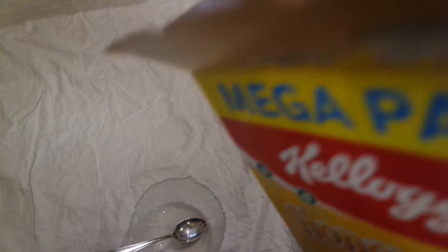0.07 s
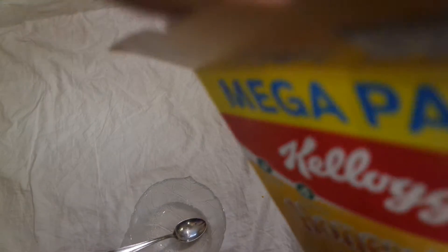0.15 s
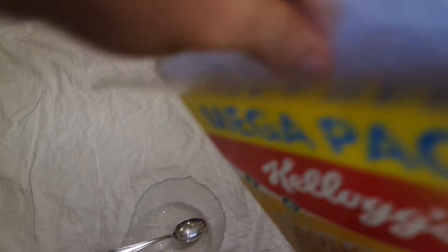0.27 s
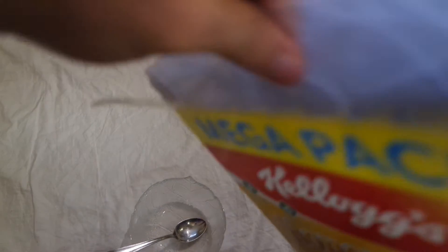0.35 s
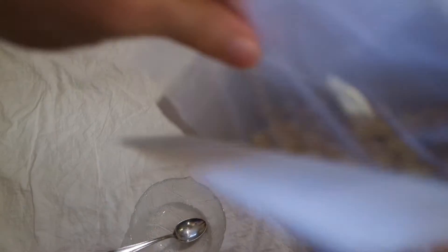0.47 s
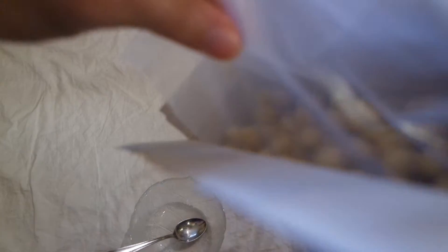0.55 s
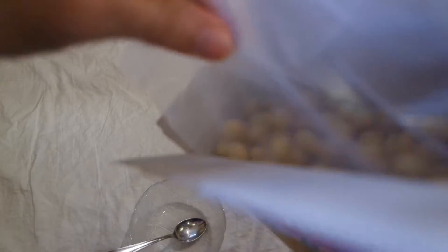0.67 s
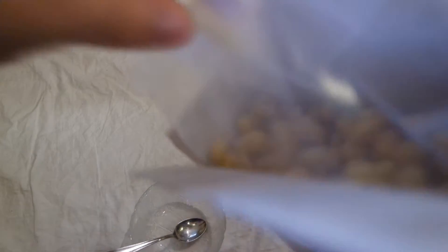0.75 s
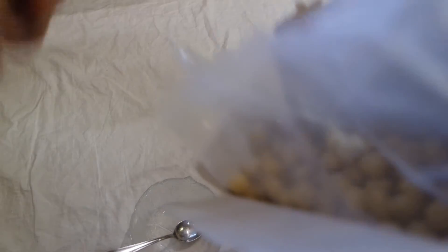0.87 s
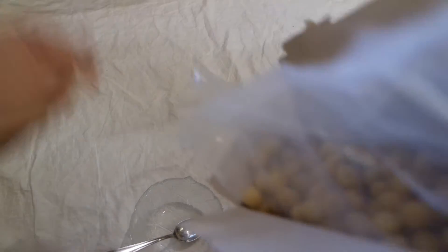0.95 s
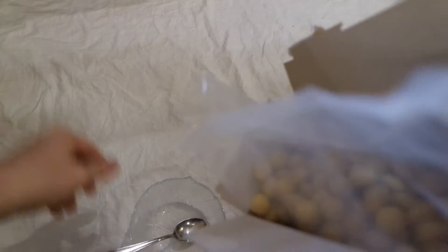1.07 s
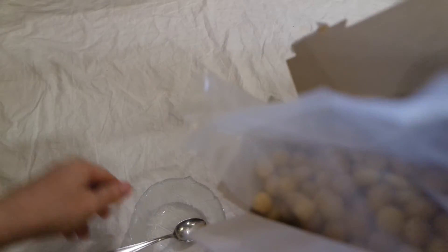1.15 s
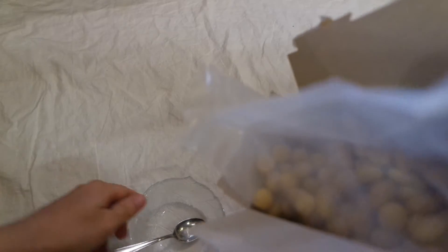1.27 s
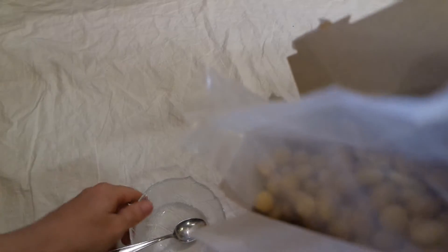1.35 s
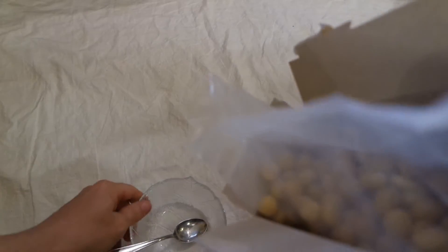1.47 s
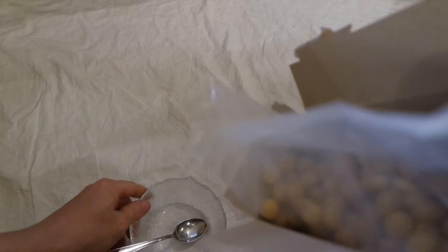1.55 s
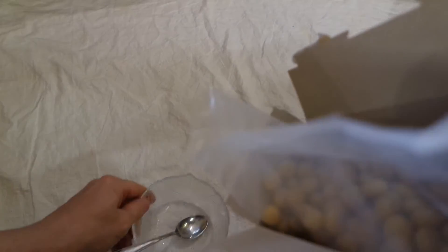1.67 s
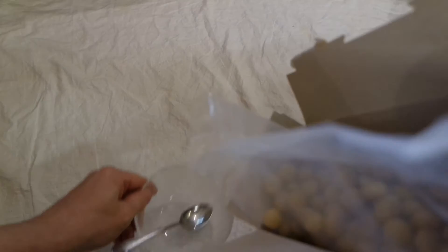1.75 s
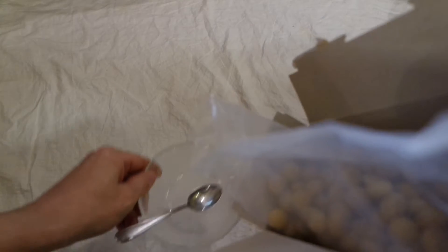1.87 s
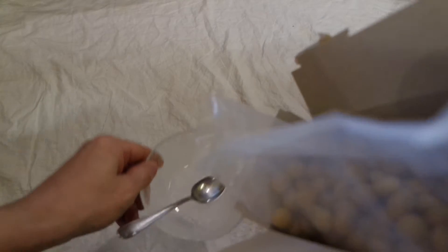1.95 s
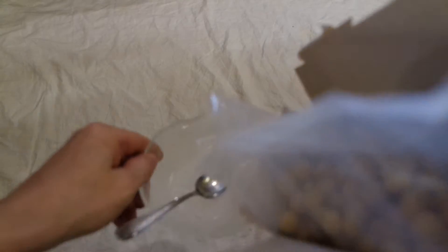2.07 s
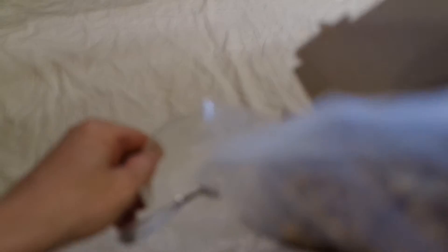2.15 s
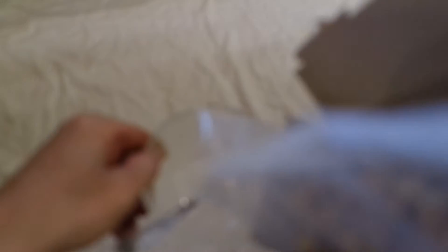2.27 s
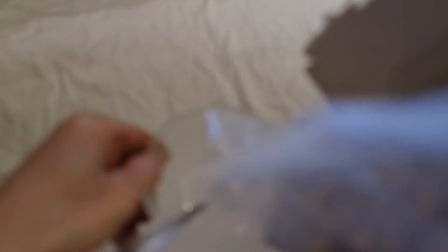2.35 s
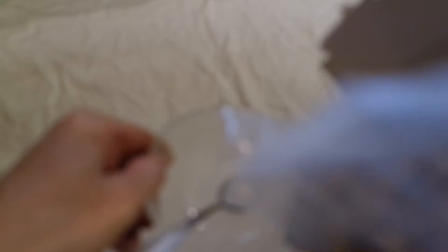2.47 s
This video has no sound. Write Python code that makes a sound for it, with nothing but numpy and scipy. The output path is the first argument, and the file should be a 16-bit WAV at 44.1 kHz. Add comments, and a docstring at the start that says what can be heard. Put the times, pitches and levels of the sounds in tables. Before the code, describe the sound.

Close stereo pickup in a small room: sharp bag crackle first, then hollow cardboard knocks and a dense dry cereal rattle, fading to near silence with light ticks, before the cereal begins shifting again.

```python
"""Cereal box on a cloth-covered table

A cardboard box holding a plastic bag of cereal balls is handled in a small room, over a faint hiss.
The bag snaps and crinkles as it is opened, the box slides and bumps while the balls shift inside,
a glass bowl is drawn closer with a few light ticks, and the cereal starts to move again.
Snaps and knocks are noise bursts led by a crack; crinkle, cereal, rubbing and rumble are dense noise
grains under level curves; thumps are short swells of a sine; box modes and room echo are added on top."""
import sys
import numpy as np
from scipy import signal
from scipy.fft import rfft, irfft
from scipy.io import wavfile
from scipy.ndimage import uniform_filter1d

SR = 44100
rng = np.random.default_rng(int(sys.argv[2]) if len(sys.argv) > 2 else 0)


def unload_wav(signal):
    """Save mono or channel-first audio to the path in sys.argv[1] as 16-bit WAV at rate SR, clipped to [-1, 1]."""
    wavfile.write(
        sys.argv[1],
        SR,
        np.round(np.clip(np.atleast_2d(signal).T, -1, 1) * 32767).astype(np.int16),
    )


N = 110250  # 2.5 s


def amp(db):
    """Decibels to gain."""
    return 10 ** (np.asarray(db) / 20)


def unit(x):
    """Scales to rms 1."""
    return x / np.sqrt(np.mean(x ** 2) + 1e-20)


def read(points, hz):
    """A spectrum's value at hz, joined by straight lines on a log frequency axis."""
    f, value = np.transpose(points)
    return np.interp(np.log(hz + 1), np.log(f + 1), value)


def add(mix, s, sound):
    """Mixes a stereo sound in at time s, cut off at the end of the mix."""
    part = mix[:, round(s * SR):][:, :sound.shape[1]]
    part += sound[:, :part.shape[1]]


def colour(x, points, size=2048):
    """Filters with the given spectrum in minimum phase, so that nothing sounds ahead of its cause."""
    hz = abs(np.fft.fftfreq(size, 1 / SR))
    log_gain = np.log(amp(read(points, hz)))
    response = np.exp(np.conj(signal.hilbert(log_gain)))
    taps = np.fft.ifft(response).real
    taps = taps.reshape((1,) * (x.ndim - 1) + (-1,))
    return signal.fftconvolve(x, taps, axes=-1)[..., :x.shape[-1]]


def stereo(mid, side, width=None):
    """Stereo from a shared and an opposed part: by default narrowest at 300 to 700 Hz, wide in the treble."""
    # usual stereo width: f/Hz, side level/dB
    usual_width = [(30, 0), (90, -12), (300, -18.5), (700, -19), (1500, -14.5), (3000, -13.5), (6000, -4.5),
                   (13000, 1)]
    side = colour(side, usual_width if width is None else width)
    return np.array([mid + side, mid - side])


def grains(level, body, per_s, spread_db, grain_s, clump_db):
    """Many tiny contacts of uneven size, in clumps, each a brief scratch, under a level curve."""
    t = np.arange(N) / SR
    struck = rng.random(N) < per_s / SR
    sizes = amp(spread_db * np.minimum(rng.exponential(1, N), 3.5)) * struck
    # each scratch falls to 1/e of its amplitude in grain_s
    power = signal.lfilter([1], [1, -np.exp(-2 / (grain_s * SR))], sizes ** 2)
    drift = uniform_filter1d(rng.standard_normal(N), size=260)  # noise smoothed over 6 ms
    clumps = amp(clump_db * unit(drift))
    mid, side = rng.standard_normal((2, N)) * np.sqrt(power) * clumps
    curve = amp(np.interp(t, *np.transpose(level)))
    return unit(colour(stereo(mid, side), body)) * curve


def cereal_jostle():
    """Cereal balls jostle in the bag: a dense rain of tiny bright contacts."""
    # how strongly the balls move: t/s, level/dB
    movement = [(0, -64.5), (.15, -78), (.75, -56), (.8, -71), (.84, -41.5), (.88, -31), (.915, -33),
                (.95, -32.5), (1.0, -31), (1.08, -35.5), (1.15, -38.5), (1.23, -43), (1.3, -59.5),
                (1.39, -60), (1.48, -76.5), (1.72, -90), (1.75, -61.5), (1.79, -83), (1.92, -78),
                (1.97, -68.5), (2.15, -83.5), (2.39, -71), (2.43, -62.5), (2.44, -51.5), (2.5, -50)]
    # tone of the contacts: f/Hz, gain/dB
    body = [(100, -22), (500, 8.5), (1200, 0), (2800, 1.5), (5000, 1.5), (8000, -3), (11000, -6.5),
            (14000, -6.5), (16000, -21)]
    return grains(movement, body, per_s=3700, spread_db=2, grain_s=0.0004, clump_db=1.0)


def cloth_rub():
    """Cardboard and bowl rub over the cloth in many small slips, darker and more clumped."""
    # how strongly they rub: t/s, level/dB before the box rings along
    sliding = [(0, -71), (.17, -81), (.23, -85), (.35, -50), (.42, -45), (.52, -41), (.6, -38.5), (.7, -45),
               (.8, -66), (.87, -39.5), (.98, -40), (1.06, -43), (1.13, -42.5), (1.22, -54), (1.33, -61),
               (1.5, -82.5), (1.89, -73), (1.94, -60.5), (2.05, -70.5), (2.42, -69.5), (2.436, -44.5),
               (2.46, -46), (2.5, -43)]
    # tone of the rubbing: f/Hz, gain/dB
    body = [(25, -28.5), (60, -13.5), (130, -3.5), (280, -4), (430, -4), (560, 1), (660, -8), (790, -4),
            (1200, -4), (2000, -11.5), (4000, -17.5), (12000, -33)]
    return grains(sliding, body, per_s=1300, spread_db=1.5, grain_s=.0008, clump_db=2.5)


def handling_rumble():
    """Low rumble of handling: longer grains kept to the bass."""
    # how strongly it rumbles: t/s, level/dB
    handling = [(0, -66), (.16, -79), (.26, -39.5), (.33, -56.5), (.43, -45), (.6, -60), (.8, -53),
                (.87, -42.5), (.97, -39.5), (1.06, -51.5), (1.3, -56), (1.5, -82), (1.89, -71),
                (1.94, -55.5), (2.1, -71), (2.41, -69.5), (2.46, -52.5), (2.5, -46.5)]
    # tone of the rumble: f/Hz, gain/dB
    body = [(15, -10.5), (40, -10), (80, -3.5), (135, -1), (190, -7), (270, -3), (400, -16), (1500, -60)]
    return grains(handling, body, per_s=1300, spread_db=1.5, grain_s=0.0038, clump_db=1.0)


def room_hiss():
    """Faint steady coloured noise that comes from all round, so wider than the close sounds."""
    # tone of the hiss: f/Hz, gain/dB
    body = [(12, -31), (20, 4.5), (70, 1.5), (198, -12), (410, -8), (2320, -19.5), (3340, -25),
            (13200, -30), (14700, -25.5), (16000, -55)]
    # stereo width of the hiss: f/Hz, side level/dB
    wide = [(30, -9.5), (90, -7.5), (300, -3.5), (700, -3.5), (1500, -3), (4000, -0.5), (13000, 2)]
    noise = stereo(*rng.standard_normal((2, N)), wide)
    return amp(-67) * unit(colour(noise, body))


def thumps(size=4096):
    """A soft push makes a wall of the box swing for a few cycles: a sine that swells and dies."""
    # soft thumps of the box: t/s, envelope peak/dB, swell/s, pitch f/Hz
    pushes = [(.176, -50.5, 0.0034, 200), (.607, -35, 0.0072, 426), (0.9977, -27.5, 0.0035, 295),
              (1.1013, -27, 0.0024, 368), (1.1255, -24, 0.0018, 370)]
    out = np.zeros((2, N))
    t = np.arange(size) / SR
    for start, peak_db, swell_s, hz in pushes:
        envelope = amp(peak_db) * t / swell_s * np.exp(1 - t / swell_s)
        swing = envelope * np.sin(2 * np.pi * hz * t)
        add(out, start, np.tile(swing, (2, 1)))
    return out


def bag_crinkle():
    """Fine crinkle of the bag: thousands of tiny creases a second, very uneven in size."""
    # how strongly it crinkles: t/s, level/dB
    crumpling = [(.196, -102), (.208, -37.5), (.23, -39), (.25, -39.5), (.295, -33), (.35, -50.5),
                 (.38, -38.5), (.45, -39), (.5, -44.5), (.57, -38.5), (.6, -44), (.65, -42.5), (.72, -40.5),
                 (.79, -44.5), (.85, -34.5), (.9, -83)]
    # tone of the crinkle: f/Hz, gain/dB
    body = [(24, -43), (40, -4.5), (256, -8), (354, -4), (503, -0.5), (663, -1), (790, 3.5), (1300, -1),
            (4800, -5), (7000, -10), (13800, -12.5), (14800, -11.5), (16000, -48.5)]
    return grains(crumpling, body, per_s=2800, spread_db=3.5, grain_s=0.00043, clump_db=1.1)


def blow(level_db, decay_ms, ring_hz, ring_db, body, q, edge, size=4096):
    """A crack and a fast-dying flutter through one broad resonance; level is its energy packed into 1 ms."""
    ms = np.arange(size) * 1000 / SR
    mid, side = rng.standard_normal((2, size)) * np.exp(-ms / decay_ms)
    # a flutter shorter than 1 ms leaves more to the first crack
    crack = edge * max(1, 1 / decay_ms)
    mid[0], mid[1] = crack * 2, -crack
    x = colour(stereo(mid, side), body)
    ring = signal.lfilter(*signal.iirpeak(ring_hz, q, SR), x)
    x = x + (amp(ring_db) - 1) * ring
    return amp(level_db) * unit(x) / np.sqrt(ms[-1])


def blows(table, body, q, edge):
    """Plays a table of snaps or knocks; q is the ring's sharpness, edge the crack against the flutter."""
    out = np.zeros((2, N))
    for start, *row in table:
        add(out, start, blow(*row, body, q, edge))
    return out


def bag_snaps():
    """Sharp ticks, mostly creases of the bag snapping through, each with a broad ring."""
    # ticks: t/s, level/dB, decay/ms, ring f/Hz, ring gain/dB
    ticks = [(.2065, -29, 8.9, 1670, 19), (.2098, -27.5, 3.9, 13100, 20), (.2580, -21, 7.2, 4000, 5),
             (.2683, -12, 3.2, 4000, 1), (.2692, -18.5, 1.2, 13300, 23), (.2772, -19, 1.4, 4200, 20),
             (.2797, -14.5, 0.88, 3660, 19), (.2934, -11, 1.3, 9100, 10), (.2937, -16, 1.5, 1900, 18),
             (.3012, -35.5, 1.2, 2500, 2.5), (.3701, -15, 2.9, 12550, 4.5), (.3742, -16, 3, 4440, 7),
             (.4005, -21.5, 2.9, 12600, 6.5), (.4193, -20.5, 1.3, 13800, 24), (.4287, -19, 3.1, 12500, -1),
             (.4665, -24, 10, 4080, 10), (.4737, -19, 3.2, 4400, 3), (.5063, -26, 1.1, 2600, 15),
             (.5235, -32, 0.67, 4540, 7), (.5344, -20, 2, 11600, 6), (.5515, -39, 1.9, 12000, -9.5),
             (.5552, -14.5, 5.8, 2550, 7.5), (.6078, -19, 1.5, 5340, 10), (.6206, -15, 0.74, 12930, 11),
             (.6212, -13, 1.2, 1380, 1), (.7172, -29, 1.4, 1700, 12), (.8406, -22.5, 2.6, 2860, 15),
             (.9110, -22.5, 1.7, 3200, 12), (.9482, -19, 2.1, 7300, 11), (1.0693, -21, 1.2, 12000, 4.5),
             (1.2775, -40, 1.1, 5000, 12), (1.3090, -38.5, 1.1, 4200, 21.5),
             (1.3560, -48, 1.34, 12160, 9.5), (1.3750, -43.5, 1.2, 7150, 4.5),
             (1.4150, -56.5, 1.4, 4470, 5), (1.8675, -57.5, 1.14, 4000, 5), (1.9105, -39, 1.2, 5300, 18.5),
             (1.9242, -34.5, 2.5, 5740, 15), (1.9870, -56, 2.8, 2200, 18), (2.0380, -59.5, 1.77, 4790, 7),
             (2.4332, -32, 0.51, 3985, 5), (2.4645, -36, 1.7, 2700, 15)]
    # tone of the ticks: f/Hz, gain/dB
    body = [(100, -26.5), (500, -5.5), (1500, 2), (4000, 1), (7000, -0.5), (11000, -2), (14000, -0.5),
            (17000, -14.5)]
    return blows(ticks, body, q=3.0, edge=1.8)


def box_knocks():
    """Bumps of the box and of things set on the cloth: duller blows with a stronger first crack."""
    # bumps: t/s, level/dB before the box rings along, decay/ms, ring f/Hz, ring gain/dB
    bumps = [(.2765, -25, 19, 113, 28), (.622, -27.5, 28, 445, 20), (.8405, -23, 2.5, 1730, 30),
             (.868, -27, 9.7, 760, 13), (.88, -22, 9, 1040, 17), (.912, -23.5, 16, 790, 21),
             (.949, -22, 5.5, 267, 19), (1.0925, -26.5, 3.2, 403, 12.5), (1.1254, -18.5, 2.8, 1740, 7),
             (1.5085, -60.5, 2.5, 2180, 13), (1.585, -57.5, 4, 2000, 5), (1.7165, -50, 2.6, 2370, 15),
             (1.7185, -51.5, 13, 796, 13.5), (1.911, -48.5, 11.8, 400, 16), (1.926, -41, 24, 125.8, 16.5),
             (2.332, -57.5, 3.3, 1217, 18)]
    # tone of the bumps: f/Hz, gain/dB
    body = [(30, -16), (120, 3.5), (350, -3), (800, -2), (2000, -2), (3500, -14), (8000, -24.5),
            (16000, -31.5)]
    return blows(bumps, body, q=3.2, edge=6.0)


def hollow(x):
    """The box rings along with whatever rubs or bumps it; the overall level is kept."""
    # hollow resonances of the box: f/Hz, width/Hz, gain of the added ring/dB
    modes = [(271.5, 35, -5), (411, 45, 0.5), (439, 30, -3), (778, 59, 2.5), (1005, 38, -9)]
    ringing = x.copy()
    for hz, width, db in modes:
        ringing += amp(db) * signal.lfilter(*signal.iirpeak(hz, hz / width, SR), x)
    return x.std() * unit(ringing)


def room(x, size=22050):
    """Quick scatter from box and table, then the tail of a small room, as decaying noise echoes."""
    # time for the tail to fall by 60 dB: f/Hz, t/s
    fall_s = [(150, 0.96), (500, .42), (1500, 0.27), (4000, 0.19), (12000, 0.2)]
    t = np.arange(size) / SR
    noise = stereo(*rng.standard_normal((2, size)))
    hz, at, z = signal.stft(noise, SR, nperseg=256)
    fading = z * amp(-60 * at / read(fall_s, hz)[:, None])
    tail = signal.istft(fading, SR, nperseg=256)[1][:, :size]
    tail = tail * np.clip(t / 0.0045 - .5, 0, 1)  # fades in from 2.25 to 6.75 ms
    # the scatter starts after 1 ms and falls to 1/e in 17 ms
    early = stereo(*rng.standard_normal((2, size))) * np.exp(-t / 0.017) * (t > .001)
    echo = (amp(-13) * unit(tail) + amp(-10.5) * unit(early)) / np.sqrt(size)
    mono = x.mean(0)[None]
    return x + signal.fftconvolve(mono, echo, axes=1)[:, :N]


def scene():
    """Bag, cereal and box in the room, over the handling rumble and a faint hiss."""
    cereal = cereal_jostle()
    box = hollow(cloth_rub() + box_knocks()) + thumps()
    bag = bag_crinkle() + bag_snaps()
    return room(bag + cereal + box) + handling_rumble() + room_hiss()


def record(dry):
    """The right microphone is nearer: louder and a little earlier; peaks clip and the top treble is cut."""
    # how much louder the right is: f/Hz, level difference/dB
    right_lead = [(100, 2.5), (700, 1), (2500, 1.5), (13000, 2.5)]
    # treble response of the microphones: f/Hz, gain/dB
    mic_top = [(20, -5), (14600, 0.5), (15400, -22.5), (16800, -20.5)]
    lag_ms, ceiling, edge_hz = 0.038, .95, 16800
    khz = np.fft.rfftfreq(2 * N, 1000 / SR)
    late = irfft(rfft(dry[0], 2 * N) * np.exp(-2j * np.pi * khz * lag_ms))[:N]
    left = colour(late, [(hz, -db / 2) for hz, db in right_lead])
    right = colour(dry[1], [(hz, db / 2) for hz, db in right_lead])
    heard = colour(np.array([left, right]), mic_top)
    clipped = np.clip(heard, -ceiling, ceiling)
    cut = signal.firwin(511, edge_hz, window=("kaiser", 9), fs=SR)
    return signal.oaconvolve(clipped, cut[None], "same", axes=1)


dry = scene()
out = record(dry)
unload_wav(out)
```